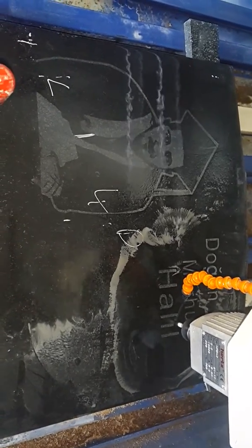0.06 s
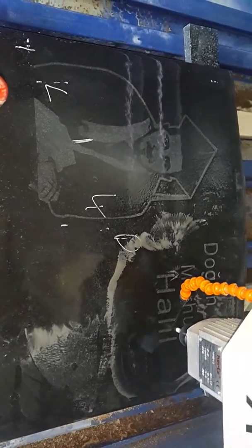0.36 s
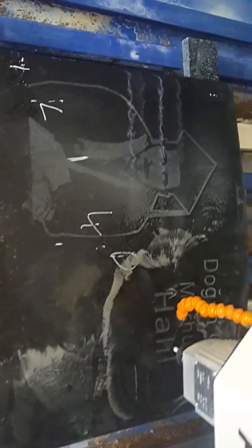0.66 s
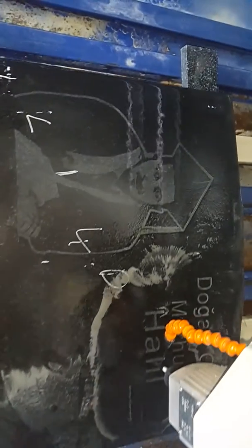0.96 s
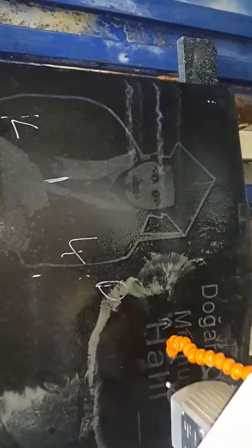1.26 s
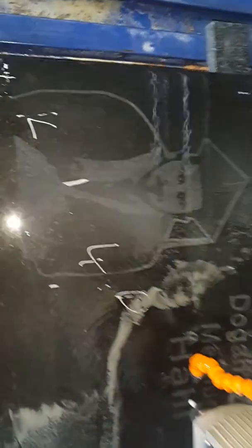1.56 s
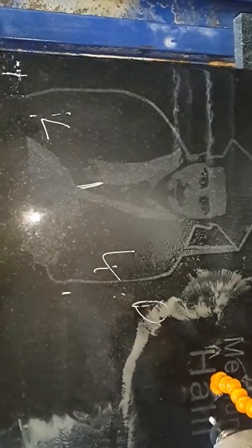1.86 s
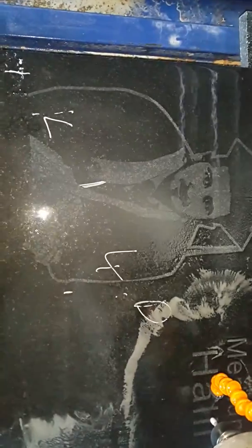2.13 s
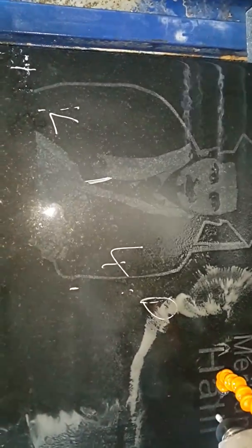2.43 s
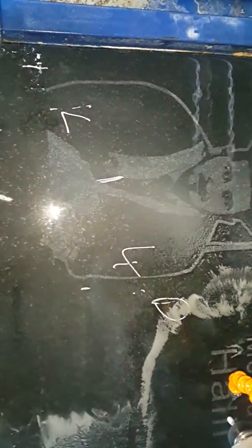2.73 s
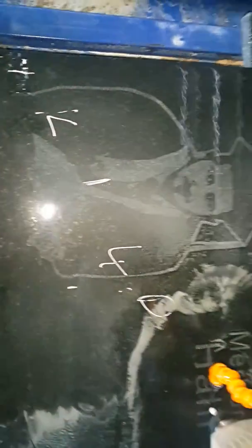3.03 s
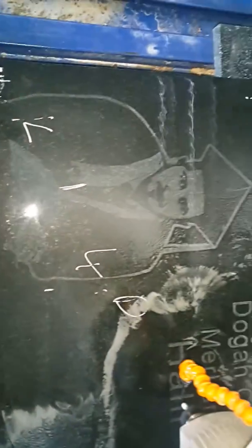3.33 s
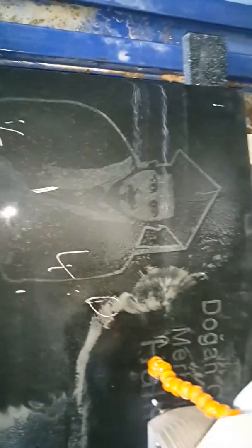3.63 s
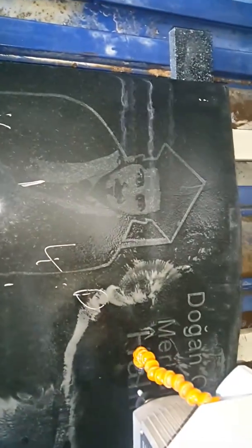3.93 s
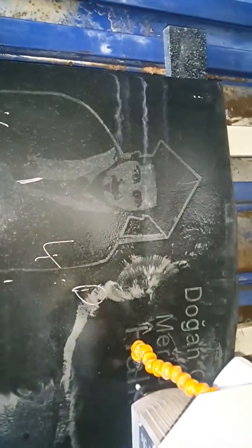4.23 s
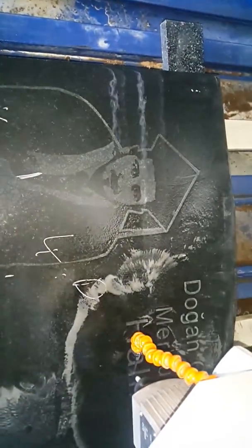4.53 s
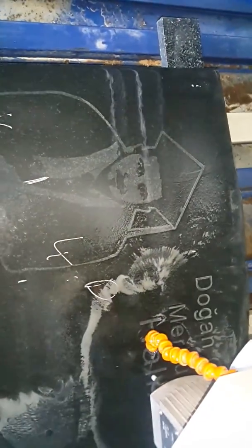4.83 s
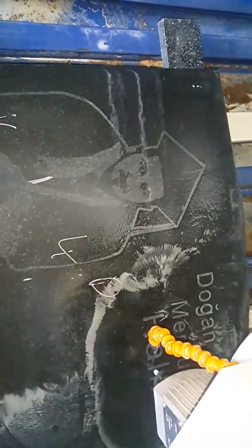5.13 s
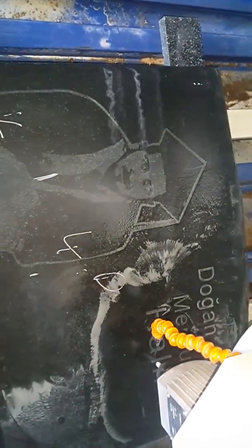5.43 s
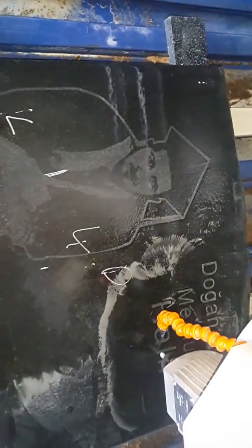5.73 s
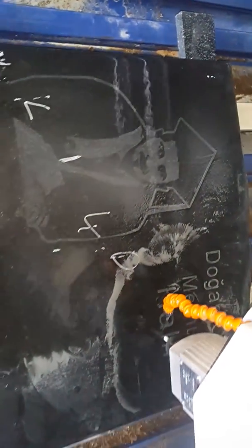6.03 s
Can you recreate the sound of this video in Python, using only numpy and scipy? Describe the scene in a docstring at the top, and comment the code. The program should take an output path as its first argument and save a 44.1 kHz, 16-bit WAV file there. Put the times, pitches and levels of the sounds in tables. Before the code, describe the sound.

A machine spindle whines and hums steadily while its bit grinds into a stone slab, hissing and faintly squealing.

```python
"""A CNC router engraves a polished granite slab in a workshop; a hand-held microphone leans in and back.
The bit grinds with a rush that rings in the machine, a fine hiss and brief squeals of chatter.
The spindle hums at its turning rate and its cooling fan whines on the 8th and 16th orders.
The inverter sings a comb of thin high lines; the axis motors drone softly, a new note with every move."""
import sys
import numpy as np
from scipy import signal
from scipy.fft import rfft, irfft
from scipy.io import wavfile

SR = 44100
rng = np.random.default_rng(int(sys.argv[2]) if len(sys.argv) > 2 else 0)


def unload_audio(sound):
    """Save the sound as a 16-bit wav file, at the path given as the first command line argument."""
    columns = np.transpose(np.atleast_2d(sound))
    # keep every value between -1 and 1, then stretch to whole-number steps
    steps = np.round(np.clip(columns, -1, 1) * 32767)
    wavfile.write(sys.argv[1], SR, steps.astype(np.int16))


N = 277389
TIME = np.arange(N) / SR
BIN_HZ = np.maximum(np.arange(N // 2 + 1) * SR / N, 1)


def from_db(db):
    """Decibels to gain."""
    return 10 ** (np.asarray(db) / 20)


def in_time(rows):
    """The columns of a curve at every sample."""
    times_s, *columns = np.transpose(rows)
    return np.array([np.interp(TIME, times_s, column) for column in columns])


def over_hz(rows):
    """The columns of a spectrum at every frequency."""
    hz, *columns = np.transpose(rows)
    return np.array([np.interp(np.log(BIN_HZ), np.log(hz), column) for column in columns])


def swell(time_s, middle_s, half_length_s):
    """A smooth rise to 1 at the middle and a fall back to 0."""
    return np.exp(-((time_s - middle_s) / half_length_s) ** 2)


def drift(rate_hz):
    """A slow random wander of spread 1, changing about rate_hz times a second."""
    hop, settle = 100, 1000
    pole = np.exp(-2 * np.pi * rate_hz * hop / SR)
    noise = rng.standard_normal(N // hop + settle + 2)
    slow = signal.lfilter([1], [1, -2 * pole, pole * pole], noise)[settle:]
    return np.interp(np.arange(N) / hop, np.arange(len(slow)), slow / slow.std())


def tone(phase, level_db, lead_rad):
    """A stereo sine of given rms level; the left channel leads by an angle."""
    return np.sqrt(2) * from_db(level_db) * np.sin([phase + lead_rad, phase])


def cutting_load():
    """The load on the bit in dB: the slow course of the cut about its mean, plus short deeper bites."""
    # how hard the bit cuts: time_s, load_db
    course = [(0.03, -29.5), (1.04, -32.5), (1.18, -31), (2.55, -30.5), (3.89, -31.5), (3.94, -30.5),
              (5.7, -31.5), (6.18, -27), (6.27, -29)]
    # deeper bites: middle_s, half_length_s, extra_db
    bites = [(0.474, 0.01, 2), (1.606, 0.033, 1), (2.152, 0.023, 0.7)]
    slow_db = in_time(course)[0]
    bite_db = sum(extra_db * swell(TIME, middle_s, half_s) for middle_s, half_s, extra_db in bites)
    return slow_db - slow_db.mean() + bite_db


def grinding_spectrum():
    """Countless grain fractures merge into a noise; left and right share less of it as pitch rises."""
    # rumble of the gantry: frequency_hz, left_db_per_hz, right_db_per_hz
    rumble = [(25, -91, -91), (50, -86, -89), (75, -81, -85), (83.5, -84, -78), (102, -66.5, -71),
              (136, -78.5, -72.5), (163, -64, -68), (183, -72, -70.5), (217, -65.5, -66.5),
              (287, -68.5, -69), (406, -64.5, -66.5)]
    # grinding rush: frequency_hz, left_db_per_hz, right_db_per_hz
    rush = [(450.0, -66.5, -72), (538, -68.5, -69.5), (714, -60.5, -59), (762, -52.5, -48.5),
            (1000.0, -51, -54), (1250.0, -52.5, -50), (1493, -57.5, -57), (1724, -52.5, -48.5),
            (2360, -53.5, -49.5), (2590, -63.1, -52), (2850.0, -67, -50), (3760, -61.5, -52),
            (4030, -54.5, -48), (4200.0, -58.5, -58), (4510.0, -59.5, -60.5), (4720, -64.5, -64),
            (5360, -63.5, -65.5)]
    # hiss of grit and spray: frequency_hz, left_db_per_hz, right_db_per_hz
    hiss = [(5560, -71, -69), (6540, -70, -64), (7070, -73, -76), (8900, -75.5, -73.5), (9740, -71, -69),
            (11540, -74.5, -71.5), (12600, -77, -80.5), (15600, -79.5, -89)]
    # likeness of the microphone's two sides: frequency_hz, coherence (0-1)
    likeness = [(30, .75), (120, .98), (300, .93), (480, .66), (750, .68), (1150, .74), (1450, .42),
                (1900, .55), (2300, .22), (3000, .1), (4000, .17), (5000, .06), (16000, .02)]
    # phase between the two sides: frequency_hz, left_lead_rad
    lead = [(350, -.05), (480, -.75), (950, -.7), (1300, -1.8), (1700, -1.7), (2150, -2.7), (2500, -1.2),
            (3100, .2), (4000, 1.5), (4700, -1.2), (7000, -.6)]
    right, unshared = rfft(rng.standard_normal((2, N))) * np.sqrt(SR / 2)
    coherence = over_hz(likeness)[0]
    shared = right * np.exp(1j * over_hz(lead)[0])
    left = np.sqrt(coherence) * shared + np.sqrt(1 - coherence) * unshared
    return np.array([left, right]) * from_db(over_hz([*rumble, *rush, *hiss]))


def cutting(load_db, flicker_db):
    """The bit grinds the stone: rumble, low rush, high rush and hiss rise with the load, the hiss most."""
    # how each of the four bands answers the load: gain_db, db_per_load_db
    response = [(0, 0.8), (0, 0.65), (0, 0.53), (.3, 0.95)]
    edges_hz = [0, 550, 1800, 4500, SR / 2]
    spectrum = grinding_spectrum()
    out = np.zeros((2, N))
    for low_hz, high_hz, (gain_db, db_per_load_db) in zip(edges_hz, edges_hz[1:], response):
        band = irfft(spectrum * ((BIN_HZ >= low_hz) & (BIN_HZ < high_hz)), N)
        out += band * from_db(gain_db + db_per_load_db * load_db + flicker_db * drift(23))
    return out


def ringing(noise, frame_size=4096):
    """The noise rings in the machine; each resonance swells or fades as the microphone passes its part."""
    # resonances of spindle housing, slab and frame, negative where the microphone sits in a node:
    # centre_hz, width_hz, left_db, right_db, pass_middle_s, half_length_s, left_swell_db, right_swell_db
    resonances = [(476, 123, -1, -1.8, 3.8, 3.0, 8, 4), (604, 93, 6, 6, -0.4, 0.5, -7, -5),
                  (738, 84, -2.5, -2, 3.5, 3.3, -17, -10), (808, 48, 3.5, 2.5, 2.5, 0.6, -1, -0.5),
                  (839, 31, -6, -2.9, 4.0, 4, -1, -14), (956, 62, 1.7, 2.5, -2, 2.0, -1, -10),
                  (1010, 63, -1.9, -2, 0.5, 0.74, -8, 3), (1147, 92, 2.5, 0.4, 6, 1.3, 5, 1.5),
                  (1223, 64, 0.2, -1, 4.6, 0.82, -7, -5), (1324, 180, -1.2, -0.8, 0.24, 0.83, 7.6, 6.5),
                  (1338, 41, 5.5, 2.1, 1.8, 1.2, -2, -1), (1368, 47, -2, -3, 3, 3.0, 3, -19),
                  (1435, 45, 5.5, 6, 3, 0.7, 2.6, 4), (1556, 65, 0.5, 6, 3.5, 2.4, -20, -1),
                  (1605, 52, 3, 2.5, 1.5, 0.69, 11, 1), (1660, 77, 2.5, -1.8, 3.5, 0.61, 2, 4),
                  (1750, 105, -4, -0.8, 0.0, 1.4, 4.5, -1.5), (1841, 78, 4, 0.5, 1.9, 2, -15, -1),
                  (1960, 80, -6, -5, 5, 0.7, 7, -2), (2090, 120, 0, 0.8, 4.5, 1.5, -2, -8.1),
                  (2133, 39, 3, 2.1, 5.5, 1.8, -13, 4.9), (2177, 22, 3, -4.4, -8, 0.5, 13, 2.8),
                  (2354, 34, 0.9, 0, 1, 1.1, -7.4, 10), (2340, 128, -4.5, -0.3, 1, 3.3, -6, -0.4),
                  (2507, 65, 7, 7.5, 4.5, 2, -4.1, 5.5), (2593, 75, -5, -1.5, 4.5, 1.1, -5.6, 10),
                  (2695, 190, 0, -4, -3.5, 1.1, -18, -5), (2760, 58, 0.8, 2, 1.5, 1.9, 0.3, -2),
                  (2780, 64, 5, 1.5, 5.5, 1.4, -5.0, -9), (3060, 104, -3, 5, 4.0, 1.1, 1.7, 7.1),
                  (3138, 63, 1.5, -2.4, 5, 2.1, -2, -5.0), (3211, 68, 7, 5.5, 0, 1.3, 6, 2),
                  (3310, 101, 2, -1.5, 1.5, 3.0, -3.5, 8), (3477, 150, 0.5, 4, 2.5, 1.1, -5, 3.5),
                  (3560, 117, 0.9, -1.5, 0.5, 0.61, -5.6, 2), (3643, 65, -2.3, 1.5, 5.4, 1.8, -0.8, -9),
                  (3766, 66, -3, -3, 2, 0.8, 2, -9), (3873, 65, -2, -0.1, 1.5, 1.3, -1, 7),
                  (4006, 100, 5, 4.5, 4, 0.52, -4, -5), (4130, 144, 0, -6, -1, 1.2, -11, 3.4),
                  (4108, 57, -2, -4, 4, 0.6, -2, -1), (4330, 123, -0.4, -0.6, 0.9, 0.35, -9, -2.4),
                  (4307, 77, 6, 6, 5, 0.8, -9, 0), (4557, 76, 2, 0.4, 5.5, 3.0, 7, 4.4),
                  (4703, 126, -1, -5, 2.4, 1.0, -5, -6), (4900, 73, 2.1, 4.5, 4.5, 2.0, -4.5, 2.4),
                  (5109, 130, 3.5, 5, 5, 0.5, 1.2, 3.1), (5274, 169, -4, -1, 5, 1.0, -6, -5.4)]
    hz, frame_s, frames = signal.stft(noise, SR, nperseg=frame_size)
    gain_db = 0
    for centre_hz, width_hz, left_db, right_db, middle_s, half_s, *swell_db in resonances:
        nearness = swell(frame_s, middle_s, half_s)
        bell = .5 ** ((2 * (hz - centre_hz) / width_hz) ** 2)
        peak_db = np.array([[left_db], [right_db]]) + np.outer(swell_db, nearness - nearness.mean())
        gain_db = gain_db + bell[:, None] * peak_db[:, None]
    return signal.istft(frames * from_db(gain_db), SR, nperseg=frame_size)[1][:, :N]


def spindle_angle():
    """The angle in radians through which the spindle has turned, at a nearly steady speed."""
    # pitch of the whine, eight beats a turn: time_s, pitch_hz
    whine_pitch = [(0.0, 1912), (0.23, 1915), (6.25, 1915), (6.29, 1910)]
    turns_per_s = in_time(whine_pitch)[0] / 8
    return 2 * np.pi * np.cumsum(turns_per_s) / SR


def spindle_hum(angle, hum_trim_db, away_db, passing_s):
    """Unbalance hums once a turn; weak higher orders come and go as the microphone passes."""
    # unbalance hum: time_s, level_db (before trim)
    hum = [(0.05, -34), (1.41, -32.5), (5.21, -31.5), (6.25, -33)]
    # weak spindle orders: cycles_per_turn, nearest_level_db, nearest_s
    orders = [(2, -49.5, 4.3), (4, -35.5, 1.5), (6, -66, 3.5), (32, -61, 1.6), (40, -49, 2)]
    out = tone(angle, in_time(hum)[0] + hum_trim_db, lead_rad=-0.077)
    for order, level_db, nearest_s in orders:
        fade_db = away_db * (1 - swell(TIME, nearest_s, passing_s))
        phase = order * angle + 0.17 * drift(1.6)
        out += tone(phase, level_db + fade_db + 0.92 * drift(1.6), lead_rad=-1.24)
    return out


def fan_whine(angle, whine_trim_db, shake_rad, flutter_db):
    """The cooling fan whines eight times a turn and on the octave above; both flutter."""
    # the whine at the microphone: time_s, left_db, right_db (both before trim), left_lead_rad
    whine = [(0.0, -20.2, -17.3, -2.1), (0.78, -23.1, -18.5, -2.5), (0.99, -26.6, -21.7, -2.4),
             (1.06, -25.1, -22.0, -1.7), (1.34, -17.6, -22.7, -2.1), (1.7, -20.8, -21.3, -2.9),
             (2.4, -22.5, -22.2, -2.2), (3.6, -22.4, -21.1, -2.5), (3.82, -19.7, -19.8, -2.1),
             (4.95, -17.3, -21.9, -2.2), (6.01, -18.8, -23.4, -1.5), (6.29, -22.3, -28.5, -0.3)]
    # its octave: time_s, left_db, right_db, left_lead_rad
    octave = [(0, -31.2, -35.2, -0.7), (0.48, -31.8, -27.9, 1.1), (0.66, -36.7, -21.5, 1.2),
              (0.85, -44.4, -19.0, 3.4), (1.0, -26.5, -15.7, 3.4), (1.12, -27.1, -17.9, 3.5),
              (1.21, -23.1, -26.2, 3.8), (1.32, -26.0, -23.1, 6.3), (1.52, -28.0, -21.2, 7.2),
              (1.72, -47.1, -30.1, 6.7), (2.05, -30.8, -23.0, 8.5), (2.6, -31.2, -27.4, 8.4),
              (2.95, -29.0, -24.6, 9.0), (3.2, -29.6, -20.7, 8.5), (3.5, -37.8, -21.8, 8.6),
              (3.75, -46.9, -26.9, 10.9), (4.3, -40.9, -24.2, 11.7), (4.6, -38.7, -22.2, 11.6),
              (5.4, -31.2, -18.9, 9.8), (5.85, -40.9, -21.5, 8.2), (6.04, -37.6, -36.2, 11.2),
              (6.2, -34.4, -20.9, 13.2), (6.29, -32.9, -14.9, 13.3)]
    blade_phase = 8 * angle + shake_rad * drift(14)
    out = np.zeros((2, N))
    for harmonic, curve, trim_db in ((1, whine, whine_trim_db), (2, octave, 0)):
        left_db, right_db, lead_rad = in_time(curve)
        level_db = np.array([left_db, right_db]) + trim_db + flutter_db * drift(8.9)
        out += tone(harmonic * blade_phase, level_db, lead_rad)
    return out


def inverter(angle, carrier_hz, waver_db):
    """The switching carrier beats with the drive; the microphone crosses each line's standing waves."""
    # inverter lines: carrier_multiple, added_cycles_per_turn, left_lead_rad, left_db, right_db,
    # crests and nodes crossed as (middle_s, half_length_s, left_swell_db, right_swell_db)
    sidebands = [(1, -5, -1.2, -43.5, -42.5, [(.65, .35, -10, -8), (1.9, .1, -6, -8), (2.35, .35, 2, 3),
                 (3.3, .15, -4, -12), (5.95, .25, 4, 2)]), (1, -4, -1.2, -48, -50, [(0, .4, 1, 11),
                 (4.35, .35, 4, 8), (5.4, .5, 5, -3)]), (1, -2, -1.2, -48, -52, [(.2, .55, 8, 15),
                 (1.25, .15, 3, 8), (2.55, .6, 9, 9), (3.35, .15, -6, 7), (5.5, .7, 6, -7),
                 (6.25, .3, 1, 20)]), (1, -1, -.1, -53, -53, [(.1, .7, 8, 17), (1.1, .45, 14, 11),
                 (2.8, .3, 0, 8), (4, .25, 7, 6), (5.45, .3, 11, 13), (6.05, .33, 10, 16)]),
                 (1, -.5, -2.7, -62, -57, [(.8, .15, 4, 8), (6.2, .4, 4, 11)]),
                 (1, 0, -1.3, -57, -52, [(.9, .35, 0, 8), (2.4, .9, 9, -1), (5.4, .5, 6, 5),
                 (6.2, .2, -8, 8)]), (1, 1, -1.4, -44.5, -46, [(.6, .2, 2, 11), (1.35, .15, -7, 8),
                 (3.35, .22, 2, 10), (4.55, .95, 1, 8.5), (5.85, .15, -12, -3), (6.27, .15, -3, 12)]),
                 (1, 2, .1, -57, -46, [(.5, .4, 0, -6), (2.45, .85, -2, 9.5), (3.1, .15, 9, 3),
                 (6.15, .25, 5, 12)]), (1, 3, 1.8, -58, -49.5, []), (1, 4, 1, -63, -59, []),
                 (1, 5, 1.6, -58, -55, []), (1, 9, 1.4, -63, -61, []), (2, -3, -.3, -59, -60, []),
                 (2, -2, 1, -61, -61, []), (2, 0, -1.6, -61, -59, []), (2, 2, 1, -64, -65, []),
                 (2, 3, -.3, -62, -64, []), (2, 4, 0, -67, -68, []), (2, 6, .5, -67, -69, [])]
    out = np.zeros((2, N))
    for multiple, order, lead_rad, left_db, right_db, crossings in sidebands:
        phase = 2 * np.pi * multiple * carrier_hz * TIME + order * angle
        level_db = waver_db * np.array([drift(1.3), drift(2.7)]) + [[left_db], [right_db]]
        for middle_s, half_s, *swell_db in crossings:
            level_db += np.outer(swell_db, swell(TIME, middle_s, half_s))
        out += tone(phase + 0.11 * drift(12), level_db, lead_rad + 0.29 * drift(0.6))
    return out


def axis_motors(load_db, db_per_load_db, ramp_s, waver_db):
    """Each move of the gantry drones at its own step rate, louder as the bit pushes back."""
    # axis moves: start_s, end_s, pitch_hz, level_db (at mean load, before panning)
    moves = [(0, .465, 117.7, -45), (.08, 1.377, 99, -48.5), (1.207, 3.576, 350, -49.5),
             (1.253, 2.05, 148.8, -49.5), (2.05, 2.22, 130, -52), (2.4, 3.22, 117, -48.5),
             (2.582, 2.74, 260, -41), (3.317, 3.48, 114.5, -48), (3.56, 6.2, 329.4, -45.5),
             (3.85, 4.4, 220, -46), (4.084, 4.35, 109, -48), (5.324, 5.58, 110, -50.5),
             (5.875, 6.275, 109.2, -46.5), (6.11, 6.3, 387, -43.5)]
    out = np.zeros(N)
    for start_s, end_s, pitch_hz, level_db in moves:
        moving = (TIME > start_s) & (TIME < end_s)
        t = TIME[moving]
        ramp = np.clip(np.minimum(t - start_s, end_s - t) / ramp_s, 0, 1)
        drone_db = level_db + db_per_load_db * load_db[moving] + waver_db * drift(11)[moving]
        phase = 2 * np.pi * pitch_hz * t + 0.52 * drift(4.1)[moving]
        out[moving] += np.sqrt(2) * ramp * from_db(drone_db) * np.sin(phase)
    return out * from_db([[.6], [-.6]])  # slightly left of centre


def bit_squeals(left_trim_db, flutter_db, wander_rad):
    """The bit catches on the stone and chatters on one of its modes, wavering in level and pitch."""
    # spells of chatter: middle_s, half_length_s, pitch_hz, right_db
    squeals = [(.1, .13, 4328, -30), (.72, .09, 2076, -28), (1.85, .45, 3993, -30.5),
               (3.06, .055, 2510, -25), (3.85, .7, 2488, -30.5), (3.9, .06, 804, -25),
               (4.7, .05, 3075, -27), (4.937, .035, 2490, -23), (5.2, .25, 3993, -30),
               (5.5, .35, 2493, -30.5), (6.05, .2, 3985, -31)]
    out = np.zeros((2, N))
    for middle_s, half_s, pitch_hz, level_db in squeals:
        phase = 2 * np.pi * pitch_hz * TIME + wander_rad * drift(8.2)
        chatter = tone(phase, level_db + flutter_db * drift(33), lead_rad=-0.45)
        out += swell(TIME, middle_s, half_s) * chatter
    return out * from_db([[left_trim_db], [0]])


def scene():
    """The router at arm's length: hum, whine and inverter share one spindle; cut and motors one load."""
    load_db = cutting_load()
    angle = spindle_angle()
    return (ringing(cutting(load_db, flicker_db=0.5))
            + spindle_hum(angle, hum_trim_db=-1.0, away_db=-8.0, passing_s=1.6)
            + fan_whine(angle, whine_trim_db=-0.14, shake_rad=0.088, flutter_db=1.2)
            + inverter(angle, carrier_hz=5859.4, waver_db=1.8)
            + axis_motors(load_db, db_per_load_db=0.6, ramp_s=0.052, waver_db=0.7)
            + bit_squeals(left_trim_db=-8.0, flutter_db=0.5, wander_rad=0.63))


def record(dry):
    """The rare highest peaks are rounded; the top of the treble is cut steeply."""
    ceiling, cutoff_hz = .93, 15760
    rounded = dry / (1 + (dry / ceiling) ** 12) ** (1 / 12)
    return irfft(rfft(rounded) / np.sqrt(1 + (BIN_HZ / cutoff_hz) ** 1200), N)


dry = scene()
out = record(dry)
unload_audio(out)
```